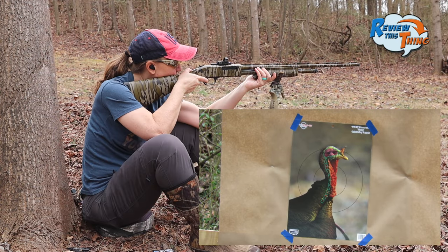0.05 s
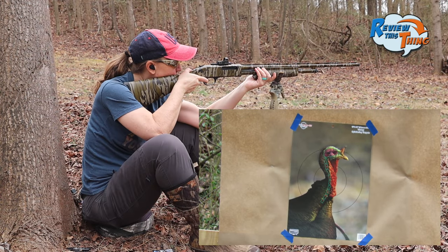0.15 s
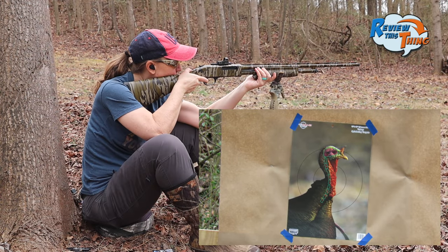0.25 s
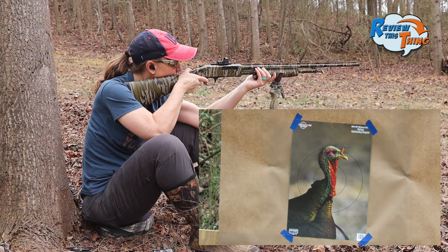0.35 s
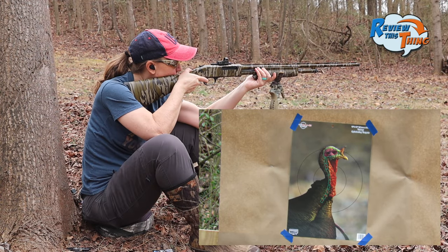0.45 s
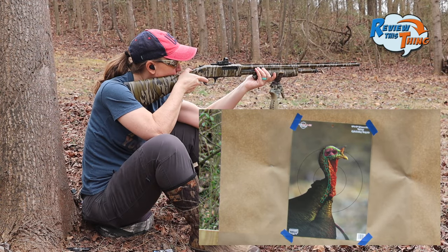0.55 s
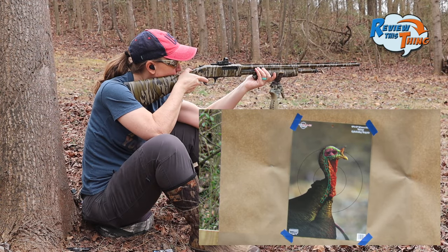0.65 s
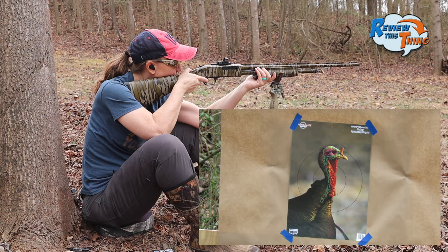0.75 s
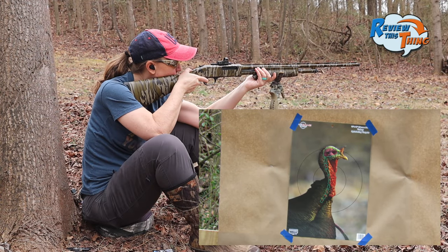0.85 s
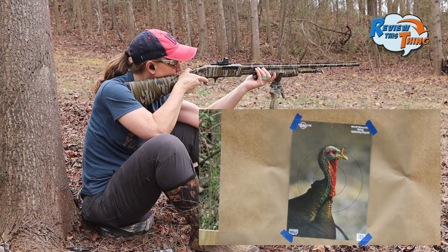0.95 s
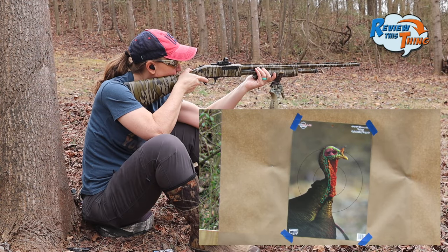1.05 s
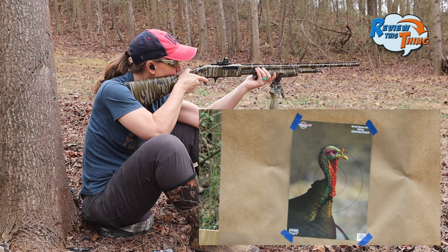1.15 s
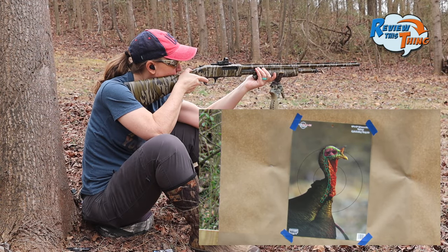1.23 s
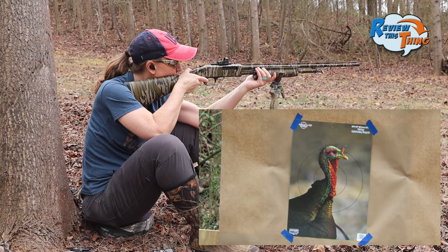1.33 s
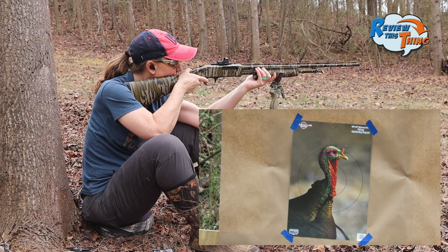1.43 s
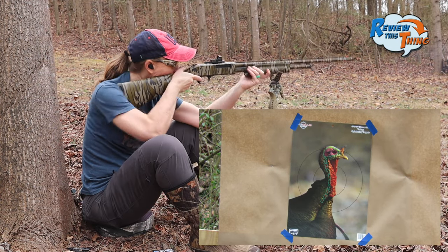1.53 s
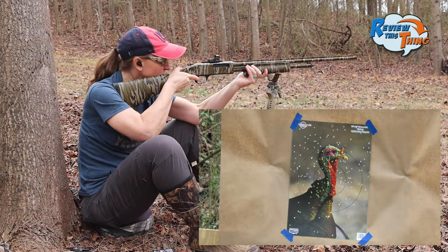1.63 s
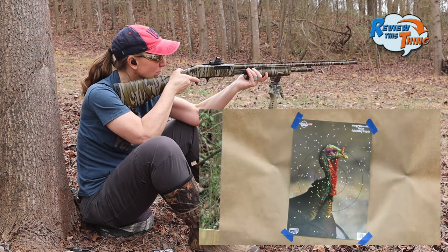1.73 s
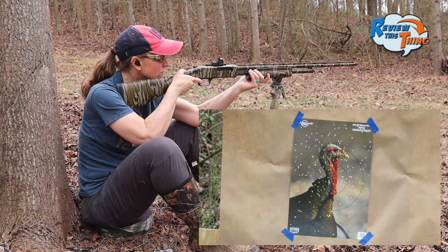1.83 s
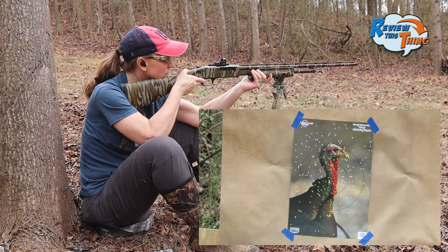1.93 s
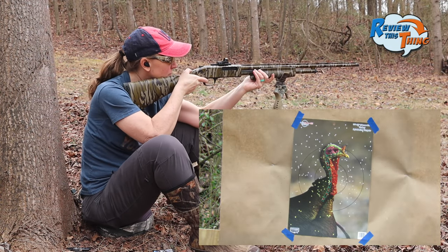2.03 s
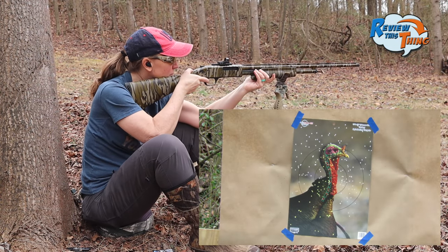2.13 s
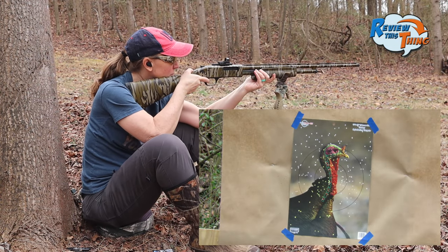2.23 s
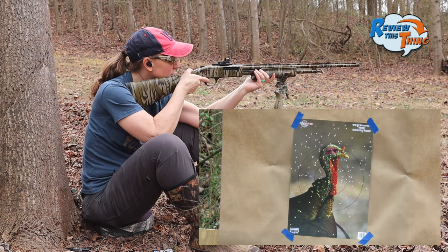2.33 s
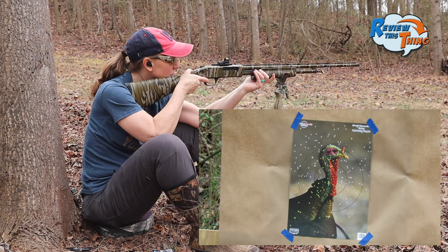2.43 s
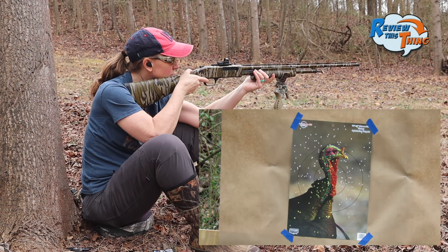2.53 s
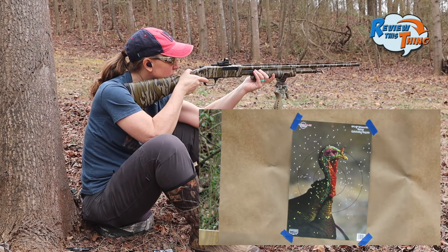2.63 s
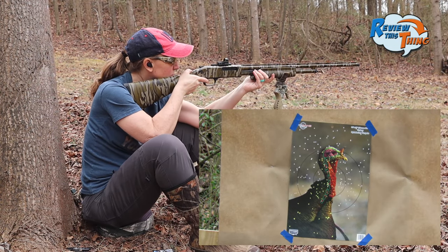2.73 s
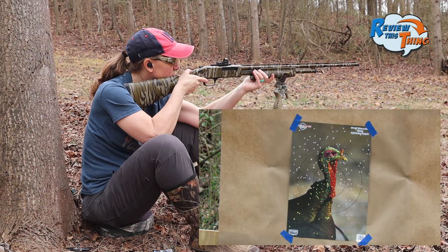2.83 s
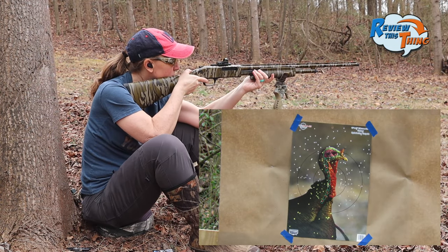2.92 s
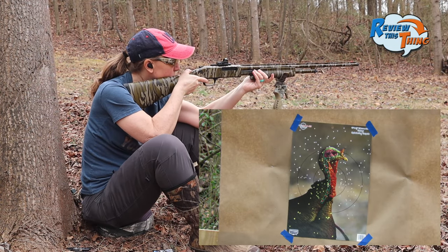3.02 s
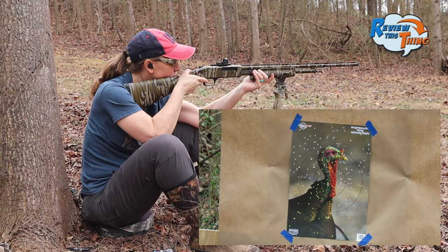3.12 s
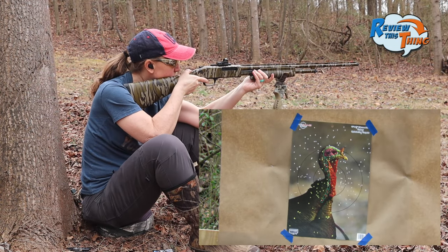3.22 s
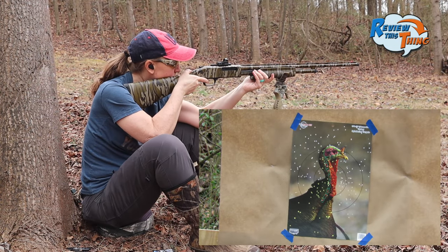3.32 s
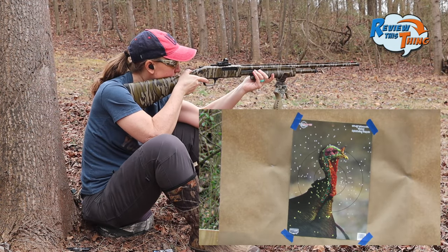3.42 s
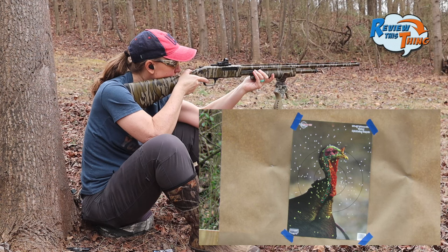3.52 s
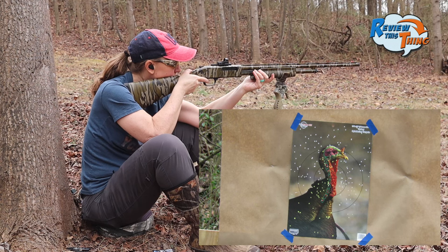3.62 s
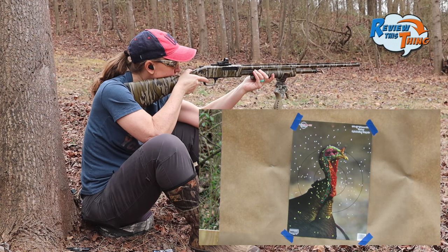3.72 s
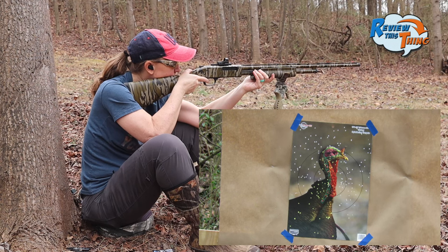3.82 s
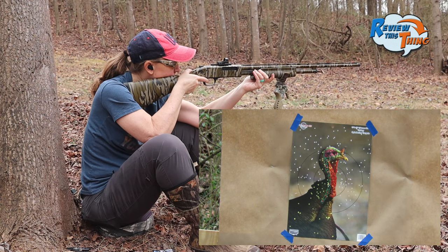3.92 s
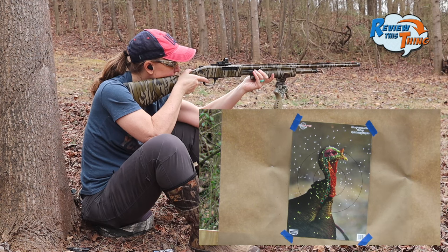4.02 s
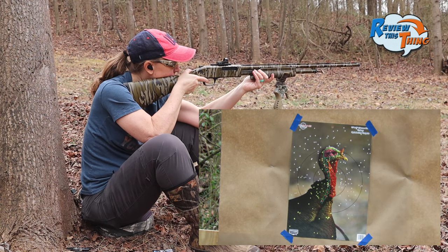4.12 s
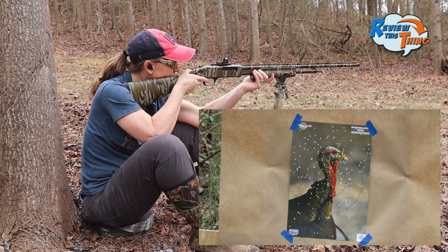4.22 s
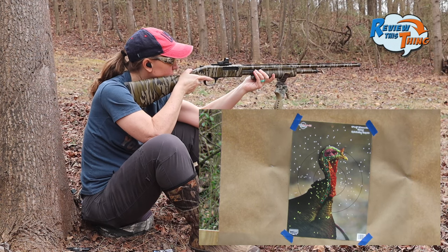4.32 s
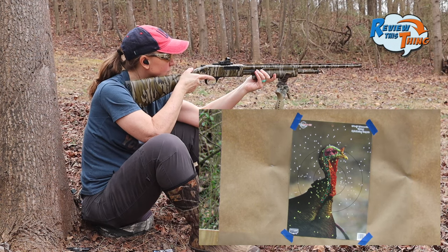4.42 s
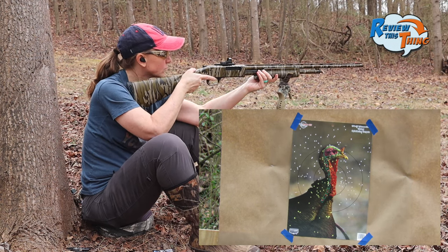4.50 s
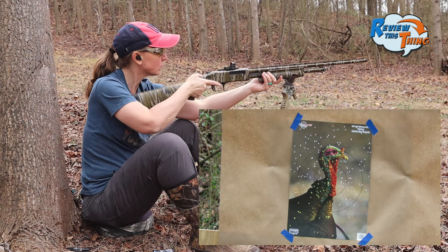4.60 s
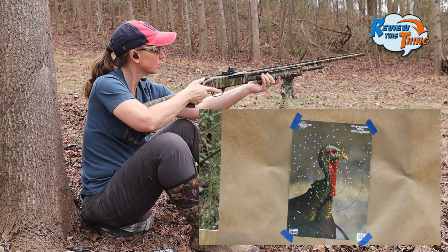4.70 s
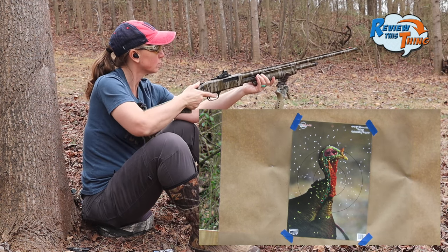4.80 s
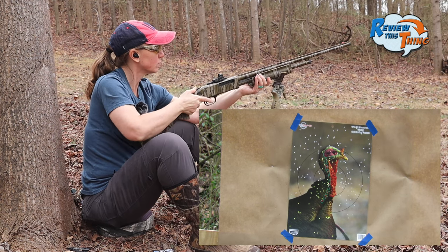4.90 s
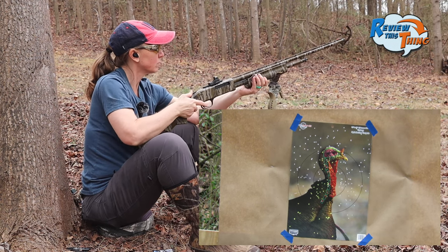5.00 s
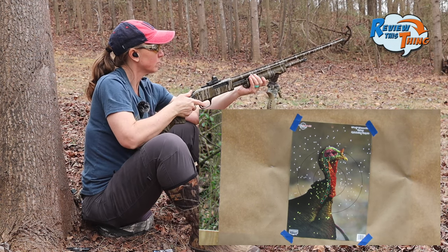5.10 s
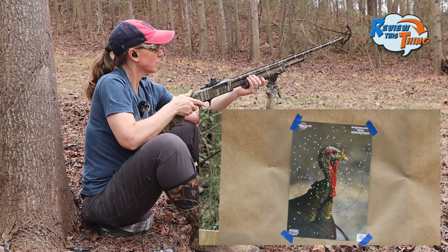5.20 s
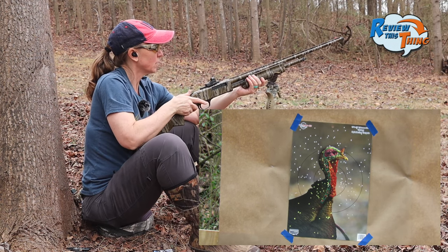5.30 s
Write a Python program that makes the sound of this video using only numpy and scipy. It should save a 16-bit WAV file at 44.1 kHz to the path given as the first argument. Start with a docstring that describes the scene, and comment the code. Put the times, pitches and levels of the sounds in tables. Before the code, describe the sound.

A single shotgun blast echoes through a wood and dies away, followed by a small metallic click and a faint rustle of clothing.

```python
"""One shotgun blast in a bare wood, overloading a microphone close to the shooter. The sound chokes for
a moment, then trunks and slopes throw it back, duller with every metre of air. Three seconds later a small
metal catch on the gun clicks, a sleeve rustles and the gun comes off the shoulder.
Behind it all lie a far-off hush and a deep rumble."""
import sys
import numpy as np
from scipy import signal
from scipy.fft import rfft, irfft
from scipy.io import wavfile

SR = 44100
rng = np.random.default_rng(int(sys.argv[2]) if len(sys.argv) > 2 else 0)


def put_to_file(sound):
    """Save the sound as 16-bit audio at rate SR, in the file named by the first command-line argument."""
    columns = np.atleast_2d(sound).T  # one column per channel
    safe = np.clip(columns, -1, 1)
    whole_steps = np.round(safe * 32767)
    wavfile.write(sys.argv[1], SR, whole_steps.astype(np.int16))


N = 235979
TIME = np.arange(N) / SR
FREQS = np.maximum(np.arange(N // 2 + 1) * SR / N, 1)
SHOT_S = 1.6053  # the charge leaves the muzzle


def undb(db):
    """Decibels to gain."""
    return 10 ** (np.asarray(db) / 20)

def noise():
    """White noise."""
    return rng.standard_normal(N)

def wander(rate_hz):
    """Smooth random motion up to about rate_hz; rms 1."""
    motion = irfft(rfft(noise()) * np.exp(-(FREQS / rate_hz) ** 2), N)
    return motion / np.std(motion)

def flutter(depth_db, rate_hz):
    """White noise whose level wanders by depth_db rms."""
    return noise() * undb(depth_db * wander(rate_hz))

def colour(x, spectrum):
    """Shape x by (f/Hz, level/dB) points, falling away below the first; rms 1."""
    hz, db = np.transpose(spectrum)
    gain = undb(np.interp(np.log(FREQS), np.log(hz), db))
    bass_cut = np.minimum(FREQS / hz[0], 1) ** 2
    shaped = irfft(rfft(x) * gain * bass_cut, N)
    return shaped / np.std(shaped)

def envelope(start, db, rise_s, hold_s, t60_s, sag_db=0):
    """Rise to db, hold while sagging by sag_db, then die away."""
    age = TIME - start
    held = age - rise_s
    release = np.exp(-np.log(1000) * np.maximum(held - hold_s, 0) / t60_s)
    return np.clip(age / rise_s, 0, 1) * undb(db - sag_db * np.clip(held / hold_s, 0, 1)) * release

def swell(t, db, half_width_s):
    """A bell-shaped gain that peaks at time t."""
    return undb(db) * np.exp(-((TIME - t) / half_width_s) ** 2)

def ring(modes, start):
    """The first 0.2 s of decaying modes that start together."""
    live = (TIME > start) & (TIME - start < 0.2)
    age = TIME[live] - start
    out = np.zeros(N)
    for hz, db, t60 in modes:
        out[live] += undb(db - 60 * age / t60) * np.sin(2 * np.pi * hz * age)
    return out


# The wood far off, with the microphone's own hiss: f/Hz, level/dB
HUSH_SPECTRUM = [(40, -1.5), (75, -4), (150, 0), (230, -1.5), (400, -7), (540, -12.5), (850, 0.5),
                 (1050, -2.5), (2000, -14), (4000, -30), (7500, -38.5), (14500, -36)]
# Deep rumble at the microphone: f/Hz, level/dB
RUMBLE_SPECTRUM = [(22, -19.5), (28, -2.5), (32, 3), (36, -4.5), (42, -16.5), (52, -36), (100, -70.5)]

def background():
    """A steady far-off hush and a narrow, deep rumble."""
    return undb(-67) * colour(noise(), HUSH_SPECTRUM) + undb(-56) * colour(noise(), RUMBLE_SPECTRUM)


# The crack and the thud under it, close to the muzzle: f/Hz, level/dB
CRACK_SPECTRUM = [(150, -14), (450, 0), (600, -5), (750, 2), (1150, 4.5), (1450, -4), (2200, -4.5),
                  (3000, -8), (4000, -3), (5800, -2.5), (8500, -7.5), (15000, -10)]
THUD_SPECTRUM = [(30, -13), (90, -3), (200, -5), (300, 2), (480, 0), (600, -10), (1500, -20), (5000, -44)]
# Brief pitched resonances that colour the crack, strongest at 5-6 kHz: f/Hz, level/dB, t60/s
BLAST_RESONANCES = [(502, -41.5, 0.24), (703, -39.5, 0.15), (1120, -36, 0.071), (3700, -37, 0.093),
                    (5260, -31, 0.054), (5870, -35, 0.0701), (6360, -35, 0.052), (7530, -39, 0.084)]
# Slaps off the closest trunks: t/s, crack level/dB, thud level/dB
TRUNK_SLAPS = [(1.6344, -37.5, -41), (1.6665, -42.5, -37.5)]

def blast():
    """Muzzle gas sputters out over a low thud and brief resonances; the closest trunks slap back."""
    crack = overload(colour(flutter(depth_db=3, rate_hz=900), CRACK_SPECTRUM))
    thud = colour(noise(), THUD_SPECTRUM)
    # Gas leaks out ahead of the charge; a roar follows the shock.
    leak = envelope(SHOT_S - 0.0068, db=-40.5, rise_s=0.0012, hold_s=0.004, t60_s=0.01)
    shock = envelope(SHOT_S, db=-23.5, rise_s=0.0007, hold_s=0.0067, t60_s=0.096)
    roar = envelope(SHOT_S, db=-42, rise_s=0.035, hold_s=0.03, t60_s=0.07)
    push = envelope(SHOT_S, db=-38.5, rise_s=0.0007, hold_s=0.008, t60_s=0.17)
    slaps = sum((undb(crack_db) * crack + undb(thud_db) * thud) * swell(t, 0, half_width_s=0.0035)
                for t, crack_db, thud_db in TRUNK_SLAPS)
    return crack * (leak + shock + roar) + thud * push + slaps + ring(BLAST_RESONANCES, SHOT_S)

def overload(x, delay_s=0.008, rise_s=0.012, low_cut_hz=250):
    """Pushed off centre by the shot, the microphone passes only the upward spikes of the wave."""
    off_centre = np.clip((TIME - SHOT_S - delay_s) / rise_s, 0, 1)
    lopsided = x - off_centre * np.minimum(x, 0)
    return signal.sosfilt(signal.butter(1, low_cut_hz, "high", fs=SR, output="sos"), lopsided)


# Near trunks and deep wood, hollowed around 550 Hz by the soft ground: f/Hz, level/dB
NEAR_WOOD_SPECTRUM = [(50, -23), (90, -16), (160, -2.5), (350, -0.5), (420, -5), (560, -8), (800, -6),
                      (1600, -6), (2200, -11.5), (3500, -12.5), (7000, -16), (15000, -22.5)]
DEEP_WOOD_SPECTRUM = [(60, -22), (110, -9.5), (200, -4.5), (300, -12), (550, -10.5), (720, -.5), (900, .5),
                      (1200, -10), (1500, -9), (2200, -17.5), (5000, -22), (8000, -27), (14000, -38)]

def wood():
    """The near trunks answer at once and fade fast; the deep wood builds slowly and rolls on."""
    near = scatter(NEAR_WOOD_SPECTRUM, grain_db=0, clump_db=2.2)
    near *= envelope(SHOT_S, db=-41.5, rise_s=0.08, hold_s=0.17, t60_s=1.0, sag_db=5.3)
    deep = scatter(DEEP_WOOD_SPECTRUM, grain_db=1.5, clump_db=1.6)
    deep *= envelope(SHOT_S, db=-48.7, rise_s=0.17, hold_s=0.52, t60_s=2.0, sag_db=5.3)
    return through_air(near + deep)

def scatter(spectrum, grain_db, clump_db):
    """Countless small reflections of unequal size, arriving in clumps as the trees stand."""
    reflections = noise() * undb(grain_db * wander(2500) + clump_db * wander(100))
    return colour(reflections, spectrum)

def through_air(x):
    """Later echoes have crossed more air, so each half octave fades at its own rate, treble first."""
    spectrum, age = rfft(x), np.maximum(TIME - SHOT_S, 0)
    centres_hz = 500 * 2 ** (np.arange(11) / 2)
    out = np.zeros(N)
    for hz, pick in zip(centres_hz, np.eye(len(centres_hz))):
        band = irfft(spectrum * np.interp(np.log(FREQS), np.log(centres_hz), pick), N)
        loss_db_per_s = 0.75 * (hz / 1000) ** 1.665
        out += band * undb(-loss_db_per_s * age)
    return out


def choke(start_s=1.6695, depth_db=-36, fall_s=0.0095, hold_s=0.024, recovery_s=0.0042):
    """Gain that collapses after the blast, stays down for a moment and springs back."""
    age = np.maximum(TIME - start_s, 0)
    fall = 1 - np.exp(-age / fall_s)
    recovery = np.exp(-np.maximum(age - hold_s, 0) / recovery_s)
    return undb(depth_db * fall * recovery)


# Returns from big trunks and banks farther out: t/s, level/dB, f/Hz, relative weight of crack
SINGLE_ECHOES = [(1.7132, -30, 330, 0.55), (1.747, -35, 260, 0.86), (1.7778, -35.5, 336, 0.45),
                 (1.789, -26.5, 846, 0.33), (1.7925, -30.5, 1200, 0.2), (1.8159, -29.5, 364, 0.95),
                 (1.8716, -29, 840, 0.18), (1.890, -31.5, 854, 0.28), (1.94, -36.5, 994, 0.11),
                 (1.952, -39, 919, 0.15), (1.9876, -36.5, 934, 0.13), (2.069, -44, 931, 0.12)]

def echoes():
    """Big trunks and banks each return a short thump, the nearer ones with more crack left."""
    crack = undb(-6) * colour(noise(), [(500, -10), (1200, 7), (4000, -3), (7000, -18), (15000, -28.5)])
    out = np.zeros(N)
    for t, db, hz, crack_weight in SINGLE_ECHOES:
        thump = np.cos(2 * np.pi * hz * (TIME - t))
        out += swell(t, db, half_width_s=0.002) * (thump + crack_weight * crack)
    return out


# Crackles on the floor of the wood: t/s, level/dB, half-width/s
LEAF_CRACKLES = [(1.852, -50, 0.013), (2.135, -72, 0.00734), (2.436, -70, 0.0045)]
# The dry leaves there: f/Hz, level/dB
LEAF_SPECTRUM = [(1000, -27), (2800, 6.5), (7000, -5.5), (15000, -16)]

def crackles():
    """Short bright patters, like debris landing in dry leaves."""
    patter = sum(swell(*crackle) for crackle in LEAF_CRACKLES)
    return patter * colour(flutter(depth_db=6.5, rate_hz=1500), LEAF_SPECTRUM)


# The catch, close to the microphone: t/s, ring level/dB, knock level/dB, tick level/dB, tick top f/Hz
CATCH_CLICKS = [(4.393, -77, -91.5, -68, 15030), (4.6044, -56, -65, -55, 10000),
                (4.6119, -42.5, -27, -38, 13990), (4.6294, -69.5, -57, -53, 6010),
                (4.6357, -67, -67, -44.5, 7560), (4.717, -89.5, -93, -71, 8020)]
# The gun's steel and its stock: f/Hz, level/dB, t60/s
STEEL_MODES = [(1603, -10, 0.06395), (2244.3, -4, 0.03242), (2720, 1, 0.021), (3800, -12.5, 0.01955),
               (4360, -8, 0.0229), (5192.7, -2.5, 0.011), (7577, -12, .012), (9706, -10, 0.023),
               (11273, -3.5, 0.039), (14500, -9.5, 0.01088)]
STOCK_MODES = [(1105, -5, 0.013), (1310, -6.5, 0.011)]
# The tick of a contact, close up: f/Hz, level/dB
TICK_SPECTRUM = [(500, 4), (1200, 1.5), (3200, -1.5), (6000, -1.5), (9000, -8.5), (15000, -3.5)]

def catch(tick_t60_s=0.018, low_cut_hz=920):
    """Each contact ticks, rings the steel and knocks the stock; parts this small radiate no bass."""
    tick_noise = colour(noise(), TICK_SPECTRUM)
    out = np.zeros(N)
    for t, ring_db, knock_db, tick_db, top_hz in CATCH_CLICKS:
        fade = (TIME >= t) * undb(-60 * np.abs(TIME - t) / tick_t60_s)
        tick = signal.sosfilt(signal.butter(2, top_hz, fs=SR, output="sos"), fade * tick_noise)
        out += undb(tick_db) * tick
        out += undb(ring_db) * ring(STEEL_MODES, t) + undb(knock_db) * ring(STOCK_MODES, t)
    return signal.sosfilt(signal.butter(7, low_cut_hz, "high", fs=SR, output="sos"), out)


# The shooter's shirt, close to the microphone: f/Hz, level/dB
SHIRT_SPECTRUM = [(900, -13), (1300, 10), (2500, -5), (4000, -16.5), (9000, -34)]
# The gun coming off the shoulder: t/s, level/dB, half-width/s
SHOULDER_SLIDES = [(4.864, -74, 0.27), (5.26, -71.5, 0.14)]

def clothes():
    """A sleeve brushes the gun as the hand works the catch; then the stock slides off the shirt."""
    sleeve_spectrum = [(1500, -4), (3500, 2), (8000, -1), (15000, -6.5)]  # f/Hz, level/dB
    sleeve = colour(flutter(depth_db=2.406, rate_hz=300), sleeve_spectrum)
    shirt = colour(flutter(depth_db=1.1, rate_hz=60), SHIRT_SPECTRUM)
    brush = swell(t=4.595, db=-76.5, half_width_s=0.062)
    slides = sum(swell(*slide) for slide in SHOULDER_SLIDES)
    return sleeve * brush + shirt * slides


def scene():
    """From beside the shooter, in mono: the blast and the wood, choked briefly; then gun handling."""
    outdoors = blast() + wood() + echoes() + crackles() + background()
    return (choke() * outdoors + catch() + clothes())[None]

def record(dry, ceiling_db=-20, top_hz=15700):
    """The microphone saturates on the blast; the highest treble is cut."""
    saturated = undb(ceiling_db) * np.tanh(dry / undb(ceiling_db))
    return signal.sosfilt(signal.ellip(10, 0.2, 70, top_hz, fs=SR, output="sos"), saturated)


dry = scene()
out = record(dry)
put_to_file(out)
```